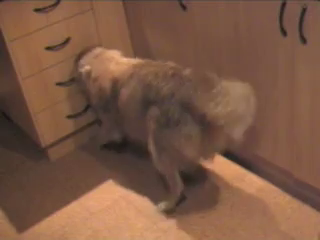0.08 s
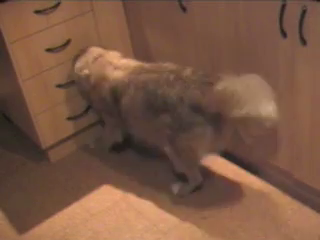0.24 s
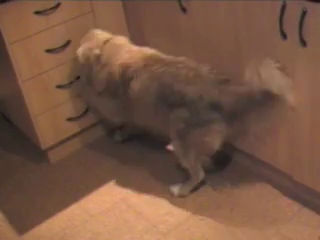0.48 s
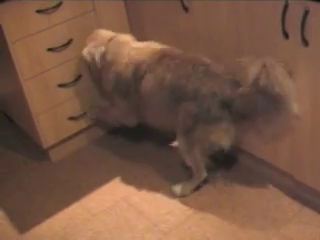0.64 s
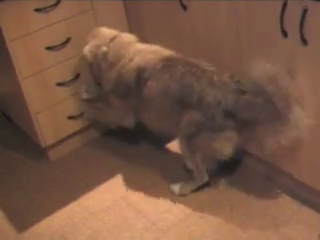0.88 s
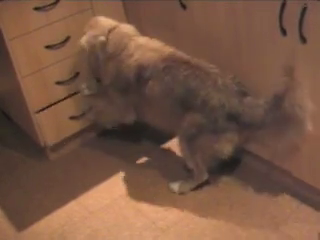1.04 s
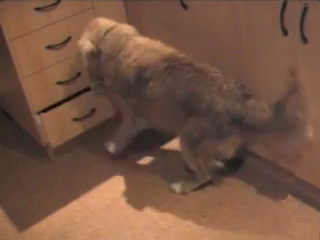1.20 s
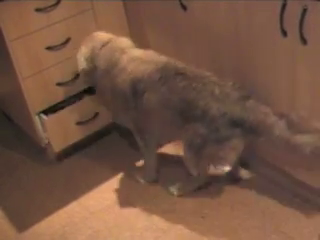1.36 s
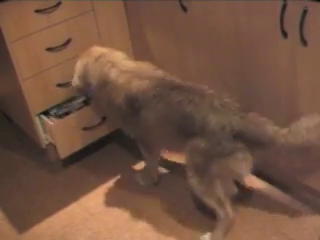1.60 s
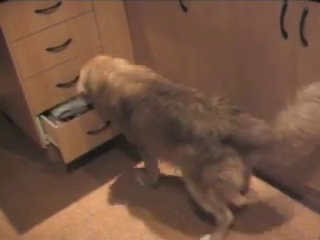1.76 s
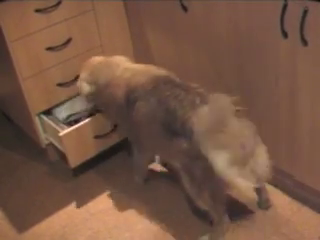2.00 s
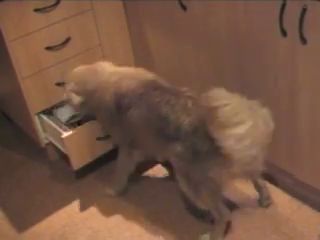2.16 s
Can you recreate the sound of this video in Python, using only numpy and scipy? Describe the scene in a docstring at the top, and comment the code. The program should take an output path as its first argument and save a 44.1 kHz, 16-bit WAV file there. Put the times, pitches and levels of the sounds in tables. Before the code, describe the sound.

A dog's paw knocks and scratches at a wooden drawer, which then scrapes open.

```python
"""In a small kitchen with hard walls, a dog paws at a wooden drawer.
Its paw thumps the hollow cabinet, and its claws knock, tick and scratch on the drawer front.
The drawer then rolls open, rumbling and rasping on its runners, while the dog steps back softly.
The room rings after each knock, and an appliance hums faintly."""
import sys
import numpy as np
from scipy import signal
from scipy.io import wavfile
from scipy.ndimage import uniform_filter1d

SR = 44100
rng = np.random.default_rng(int(sys.argv[2]) if len(sys.argv) > 2 else 0)


def wav_record(signal):
    """Record a signal, one row per channel, as 16-bit PCM in the file named by sys.argv[1]."""
    frames = np.transpose(np.atleast_2d(signal))
    bounded = np.clip(frames, -1, 1)
    # unit amplitude maps onto the largest positive 16-bit level
    quanta = np.round(bounded * 32767).astype(np.int16)
    wavfile.write(sys.argv[1], SR, quanta)


N = 99225
T = np.arange(N) / SR
HZ = np.fft.rfftfreq(8192, 1 / SR)


def amp(db):
    """Turns decibels into a number to multiply by."""
    return 10 ** (np.asarray(db) / 20)


def rms(x):
    """The average strength of a signal (root mean square)."""
    return np.sqrt(np.mean(x ** 2) + 1e-20)


def unit_rms(x):
    """Scales to an average strength of one."""
    return x / rms(x)


def unit_energy(x):
    """Scales to a total energy of one."""
    return x / np.sqrt(np.sum(x ** 2) + 1e-20)


def hit(x, db):
    """Gives a hit the energy of 10 ms of sound at this level."""
    return unit_energy(x) * amp(db) * np.sqrt(SR / 100)


def curve(points, hz=HZ):
    """Joins the dots of a table along a pitch axis."""
    point_hz, value = np.transpose(points)
    return np.interp(np.log(hz + 1), np.log(point_hz), value)


def hump_db(hz, octaves, floor_db):
    """A tone curve that peaks at one pitch and falls to a floor on both sides."""
    bell = np.exp(-.5 * (np.log2((HZ + 1) / hz) / octaves) ** 2)
    return 20 * np.log10(bell + amp(floor_db))


def colour(x, db):
    """Turns each frequency in HZ up or down, with no ringing ahead of a hit."""
    log_gain = np.log(amp(np.r_[db, db[-2:0:-1]]))
    taps = np.fft.ifft(np.exp(np.conj(signal.hilbert(log_gain)))).real[:len(HZ)]
    return signal.fftconvolve(x, taps)[:len(x)]


def add(mix, start, sound):
    """Mixes a sound in at a time in seconds."""
    part = mix[round(start * SR):][:len(sound)]
    part += sound[:len(part)]


def fade(t, fade_s):
    """Dies away by 60 dB in the fade time."""
    return np.exp(-np.log(1000) * t / fade_s)


def friction(slips_per_s=1200, spread_db=2.5):
    """Rubbing is a random stream of tiny slips of uneven size."""
    size = amp(spread_db * np.minimum(rng.exponential(1, N), 3))
    return unit_rms(size * rng.choice([-1, 1], N) * (rng.random(N) < slips_per_s / SR))


def patchy(x, depth_db):
    """Narrow bands of pitch swell and fade on their own as the rubbing spot moves."""
    bands = signal.stft(x, nperseg=1024, noverlap=768)[2]
    swells = uniform_filter1d(rng.standard_normal(bands.shape), size=7, axis=0)
    swells = unit_rms(uniform_filter1d(swells, size=8, axis=1))
    return signal.istft(bands * amp(depth_db * swells), nperseg=1024, noverlap=768)[1][:len(x)]


# the appliance's tones: (frequency [Hz], level [dB])
HUM_TONES = [(195, -73), (300, -65)]
# the tone of the room's steady noise: (frequency [Hz], gain [dB])
AIR_TONE = [(25, -16), (60, -12.5), (110, -3.5), (250, 3), (850, 0.5), (1500, -6), (3000, -14.5),
            (6500, -27.5), (8600, -53)]


def background():
    """An appliance hums faintly over the steady noise of the room."""
    hum = sum(amp(db) * np.sqrt(2) * np.sin(2 * np.pi * (hz * T + rng.random())) for hz, db in HUM_TONES)
    air = unit_rms(colour(rng.standard_normal(N), curve(AIR_TONE)))
    return hum + amp(-59) * air


# how long the room rings: (frequency [Hz], fade time [s])
ROOM_FADES = [(120, 0.66), (500, 0.52), (1400, 0.59), (3500, 0.51), (8000, 0.38)]


def room(x, build_s=0.016, echoes_per_s=600):
    """Quick echoes bounce off floor and cupboards, then blur into a smooth tail."""
    t = T[:SR]
    hz, times, bands = signal.stft(rng.standard_normal(SR), SR, nperseg=256)
    bands = bands * fade(times, curve(ROOM_FADES, hz)[:, None])
    tail = signal.istft(bands, SR, nperseg=256)[1][:SR]
    tail = unit_energy(tail * np.minimum(t / build_s, 1))
    echoes = rng.choice([-1, 1], SR) * (rng.random(SR) < echoes_per_s / SR)
    echoes = unit_energy(echoes * (t > .002) * fade(t, 0.082))
    return signal.fftconvolve(x, amp(-4.5) * echoes + amp(-5.5) * tail)[:N]


# paws on the floor: (time [s], length [s], level [dB])
PAW_STEPS = [(0.188, 0.11, -53.5), (1.367, 0.059, -50.5), (1.832, 0.11, -63.5)]
# the dull tone of a paw pad: (frequency [Hz], gain [dB])
PAD_TONE = [(45, -12.5), (148, 12), (240, 3.5), (500, 8), (850, -6.5), (6000, -50.5)]


def steps():
    """Padded feet land with a dull puff."""
    out = np.zeros(N)
    for start, length, db in PAW_STEPS:
        age = np.maximum(T - start, 0) / length * 4  # loudest at age 1
        puff = unit_rms(colour(rng.standard_normal(N), curve(PAD_TONE)))
        out += amp(db) * age * np.exp(1 - age) * puff
    return out


# the drawer on its runners: (time [s], rumble level [dB], rasp level [dB])
DRAWER_SLIDE = [(1.121, -88, -71), (1.148, -75.5, -58), (1.24, -69.5, -58.5), (1.29, -55, -57.5),
                (1.36, -63, -57), (1.498, -58.5, -59), (1.611, -57, -55), (1.674, -49, -49),
                (1.732, -53.5, -62.5), (1.769, -53, -53), (1.81, -61.5, -57.5), (1.888, -54, -59),
                (1.96, -66, -64), (2.25, -62, -63.5)]
# the tones of the shaking box and the rubbing runners: (frequency [Hz], gain [dB])
RUMBLE_TONE = [(40, -50), (130, -19), (205, -5.5), (241, 6), (290, -6.5), (360, -6), (445, -17),
               (2000, -57)]
RASP_TONE = [(50, -23), (600, 0.5), (1350, 1.5), (3400, 0.9), (4600, -7.5), (7000, -22), (8600, -65.5)]


def drawer(pitch_sag=0.12):
    """The runners rasp and shake the drawer; a faster pull rumbles louder and a little higher."""
    times, rumble_db, rasp_db = np.transpose(DRAWER_SLIDE)
    moving = T >= times[0]
    pull = moving * amp(np.interp(T, times, rumble_db))
    slowed_time = np.cumsum(1 - pitch_sag * (1 - pull / pull.max())) / SR
    shaking = unit_rms(colour(friction(), curve(RUMBLE_TONE)))
    rumble = pull * np.interp(slowed_time, T, shaking)
    rubbing = unit_rms(patchy(colour(friction(), curve(RASP_TONE)), depth_db=2.7))
    rasp = moving * amp(np.interp(T, times, rasp_db)) * rubbing
    return rumble + rasp


# claws dragging: (time [s], length [s], level [dB])
CLAW_STROKES = [(0.064, 0.056, -52), (0.152, 0.23, -60.5), (0.409, 0.16, -51), (0.554, 0.094, -38),
                (0.635, 0.028, -47.5), (0.718, 0.069, -49), (0.902, 0.17, -53.5), (1.628, 0.056, -53),
                (1.823, 0.064, -53)]
# the tone of scratched wood: (frequency [Hz], gain [dB])
SCRATCH_TONE = [(40, -43), (500, -0.5), (1000, -0.5), (2000, 3), (3500, -3), (5000, -13), (7000, -25),
                (8600, -40)]


def scratches():
    """Claws drag over the wood in strokes that swell and fade."""
    out, tone_db = np.zeros(N), curve(SCRATCH_TONE)
    for start, length, db in CLAW_STROKES:
        progress = np.clip((T - start) / length, 0, 1)
        out += amp(db) * np.sqrt(abs(np.sin(np.pi * progress))) * friction()
    return colour(out, tone_db) / rms(amp(tone_db))


# a claw tip or drawer edge snapping on wood: (time [s], level [dB])
SHARP_TICKS = [(0.489, -49), (0.602, -34), (0.7123, -46.5), (0.724, -47.5), (0.993, -52), (1.3233, -54.5),
               (1.678, -51.5)]


def ticks():
    """Hard tips and edges make short, bright snaps."""
    out, t = np.zeros(N), T[:SR // 20]
    tone_db = hump_db(hz=3600, octaves=0.45, floor_db=-49.5)
    for start, db in SHARP_TICKS:
        snap = rng.standard_normal(len(t)) * fade(t, 0.022)
        add(out, start, hit(colour(snap, tone_db), db))
    return out


# the paw bumping the cabinet: (time [s], level [dB], muffled above [Hz])
PAW_THUMPS = [(0.4174, -32.5, 900), (0.4311, -33, 610), (0.478, -43.5, 260), (0.577, -42.5, 1500),
              (0.943, -51, 400), (0.995, -43.5, 600)]
# the notes of the hollow cabinet: (frequency [Hz], level [dB], fade time [s])
CABINET_NOTES = [(146, -4, 0.32), (215, 2.5, 0.17), (244.7, 2, 0.19), (311, 1.5, 0.098),
                 (351.3, -7.5, 0.15), (450.3, -6, 0.3), (572.5, -1, 0.11)]
# the tone of the thud: (frequency [Hz], gain [dB])
THUD_TONE = [(45, -28), (170, 14.5), (400, 1), (1100, -6.5), (8600, -73)]


def thumps():
    """The paw's weight makes the cabinet thud and boom; the soft pad keeps the high notes quiet."""
    out, t = np.zeros(N), T[:SR // 2]
    boom = unit_energy(sum((-1) ** k * amp(db) * fade(t, fade_s) * np.sin(2 * np.pi * hz * t)
                           for k, (hz, db, fade_s) in enumerate(CABINET_NOTES)))
    for start, db, top_hz in PAW_THUMPS:
        burst = rng.standard_normal(len(t)) * fade(t, 0.087)
        thud = amp(-6.5) * unit_energy(colour(burst, curve(THUD_TONE)))
        softness_db = -10 * np.log10(1 + (HZ / top_hz) ** 4)
        add(out, start, hit(colour(boom + thud, softness_db), db))
    return out


# the notes of the drawer front: (frequency [Hz], level [dB])
FRONT_NOTES = [(740, 4.5), (845, 5.5), (965, 4.5), (1020, -6), (1118, -5), (1195, 1), (1420, 8),
               (1595, -9.5), (1745, -0.5), (2071, -1.5), (2170, 5), (2288, 0.5), (3280, -1)]


def front_ring(t, pitch_spread=0.02):
    """The drawer front rings briefly, a little differently wherever it is struck."""
    ring = np.zeros(len(t))
    for hz, db in FRONT_NOTES:
        shifted_hz = hz * (1 + pitch_spread * rng.standard_normal())
        ring += amp(db) * np.sin(2 * np.pi * (shifted_hz * t + rng.random()))
    return unit_energy(ring * fade(t, 0.07))


# claws and drawer knocking on wood: (time [s], level [dB], tone centre [Hz], tone width [octaves])
WOOD_KNOCKS = [(0.077, -49, 2650, 0.1), (0.1211, -37.5, 2300, 0.96), (0.1267, -36.5, 1500, 0.29),
               (0.135, -35, 1900, 0.76), (0.272, -42.5, 1380, 0.7), (0.4205, -33, 818, 0.4),
               (0.4307, -35, 974, 0.34), (0.488, -32, 1166, 0.27), (0.51, -43, 2330, 0.29),
               (0.569, -30.5, 2300, 0.69), (0.573, -35, 1572, 0.15), (0.5772, -32, 1636, 1.3),
               (0.6015, -30.5, 2990, 0.96), (0.615, -36, 2100, 0.55), (0.7115, -41, 1420, 0.96),
               (0.722, -38, 2640, 0.64), (0.941, -44, 1300, 1.4), (0.984, -47.5, 812, 0.15),
               (0.995, -43, 1650, 0.44), (1.069, -51, 2970, 0.79), (1.3235, -40, 980, 1.07),
               (1.458, -53, 3500, 0.2), (1.678, -47, 3200, 0.7), (1.686, -46, 1910, 0.057),
               (1.763, -52.5, 4100, 0.31), (1.822, -46, 1260, 0.26), (1.844, -48, 2460, 1.1),
               (1.879, -45.5, 1290, 2.6), (2.196, -52, 1420, 0.88)]
# the tone of struck wood: (frequency [Hz], gain [dB])
WOOD_TONE = [(40, -29.5), (300, -11.5), (750, 9.5), (3400, 1.5), (5000, -6), (7000, -15), (8600, -41)]


def knocks():
    """Each hard knock is a click, a short crack and the ring of the drawer front."""
    out, t = np.zeros(N), T[:SR // 3]
    click, wood_db = t == 0, curve(WOOD_TONE)
    for start, db, hz, octaves in WOOD_KNOCKS:
        crack = amp(8.5) * unit_energy(rng.standard_normal(len(t)) * fade(t, 0.045))
        wood = colour(click + crack, wood_db) / rms(amp(wood_db))
        knock = wood + amp(2.5) * front_ring(t)
        add(out, start, hit(colour(knock, hump_db(hz, octaves, floor_db=-27)), db))
    return out


def scene():
    """Dog and drawer in the kitchen; the thumps and ticks get less echo than the rest."""
    echoey = knocks() + scratches() + steps() + drawer()
    near = thumps() + ticks()
    return (echoey + near + room(echoey + amp(-4) * near) + background())[None]


def record(dry, silence_s=0.0765, roll_off_hz=8000, edge_hz=8850):
    """After a moment of silence the sound starts; the microphone loses the highest treble."""
    roll_off = signal.butter(8, roll_off_hz, fs=SR, output="sos")
    heard = signal.sosfilt(roll_off, dry * (T >= silence_s))
    steep_cut = signal.firwin(301, edge_hz, window=("kaiser", 8), fs=SR)
    return signal.oaconvolve(heard, steep_cut[None], "same")


dry = scene()
out = record(dry)
wav_record(out)
```